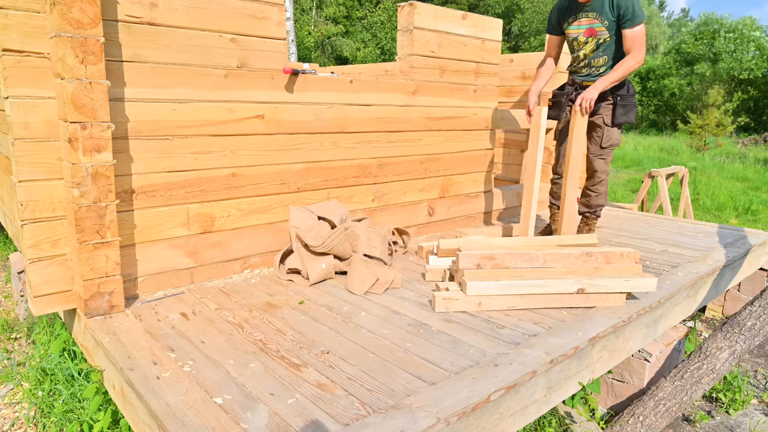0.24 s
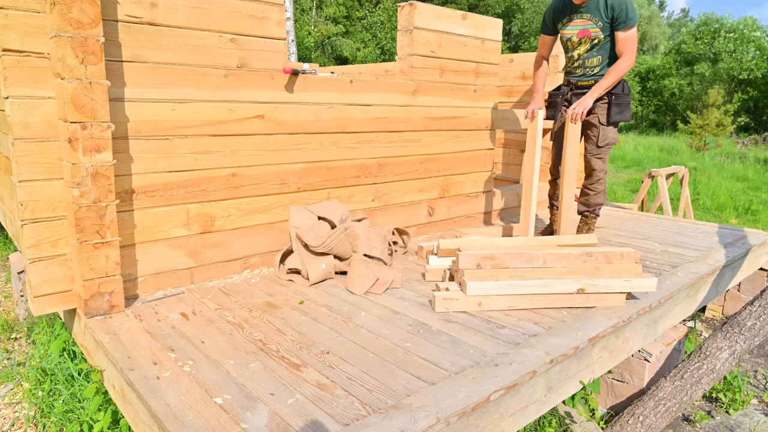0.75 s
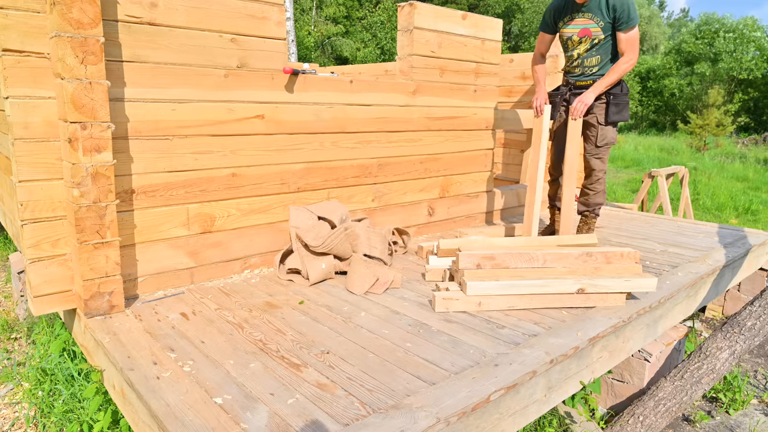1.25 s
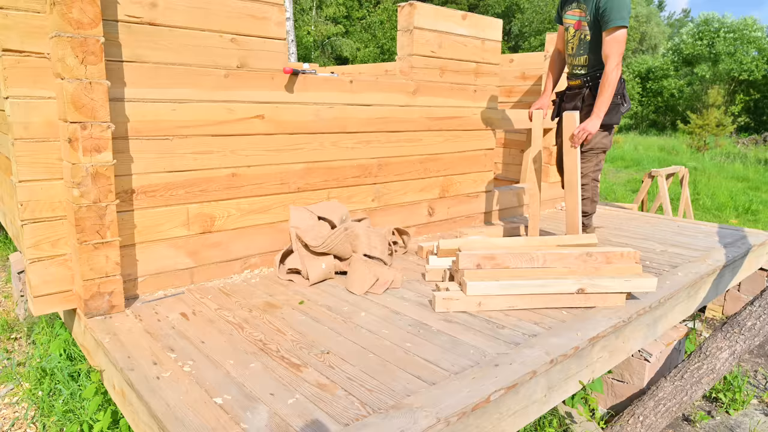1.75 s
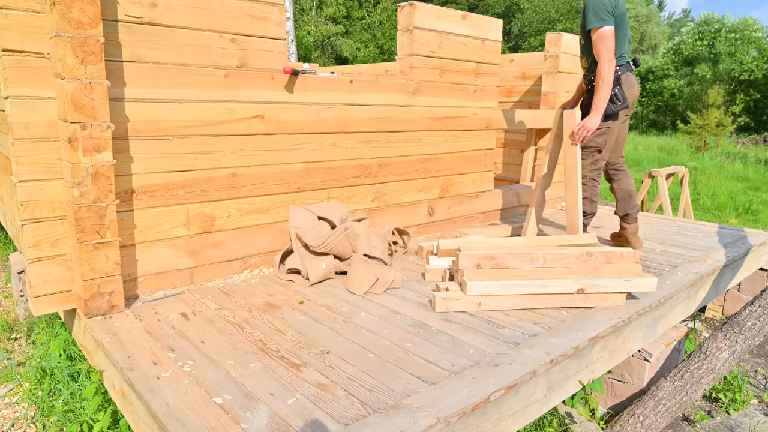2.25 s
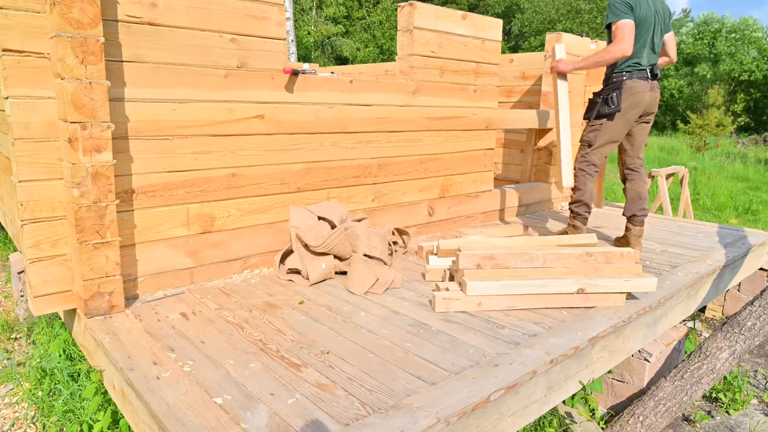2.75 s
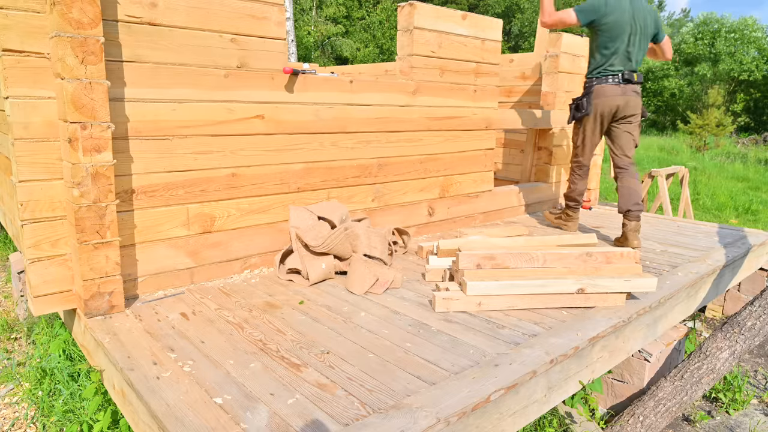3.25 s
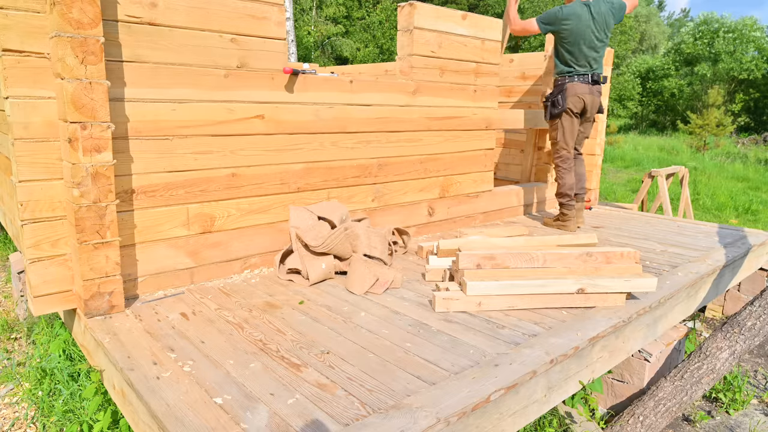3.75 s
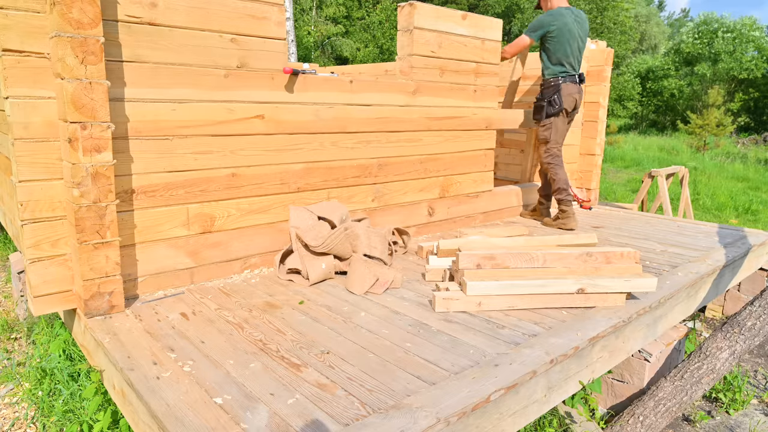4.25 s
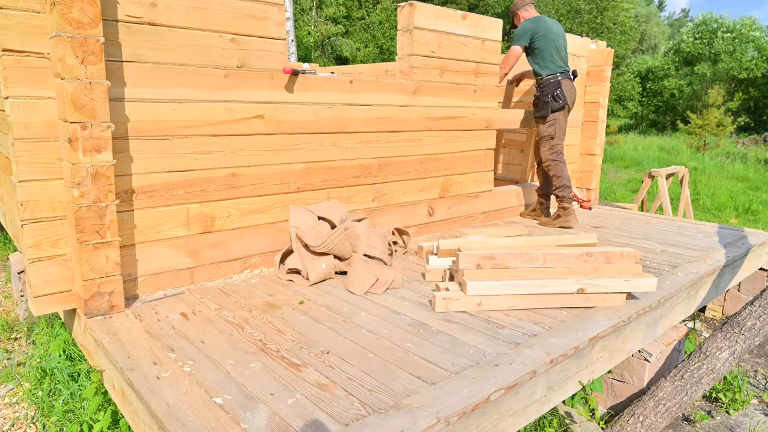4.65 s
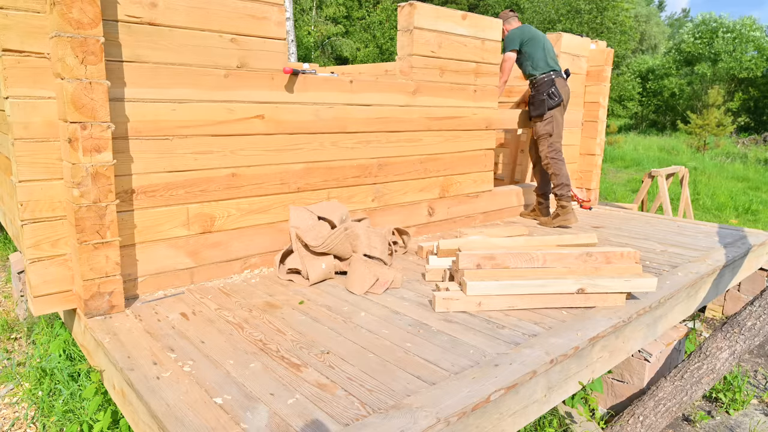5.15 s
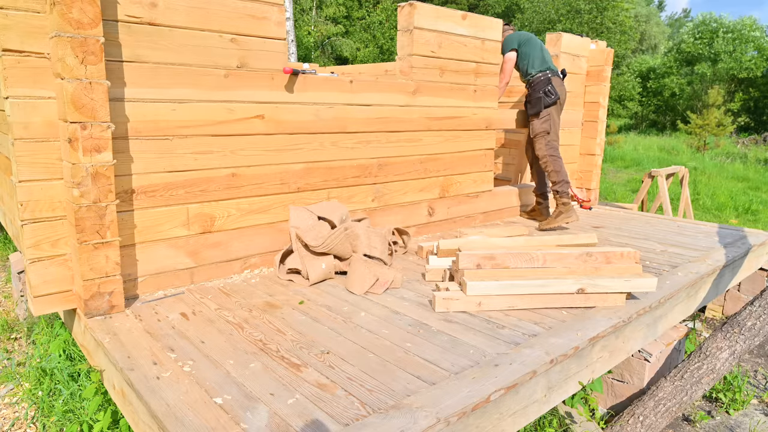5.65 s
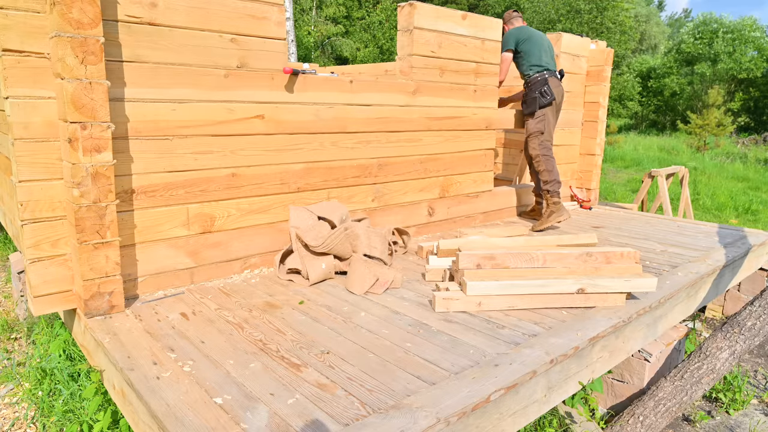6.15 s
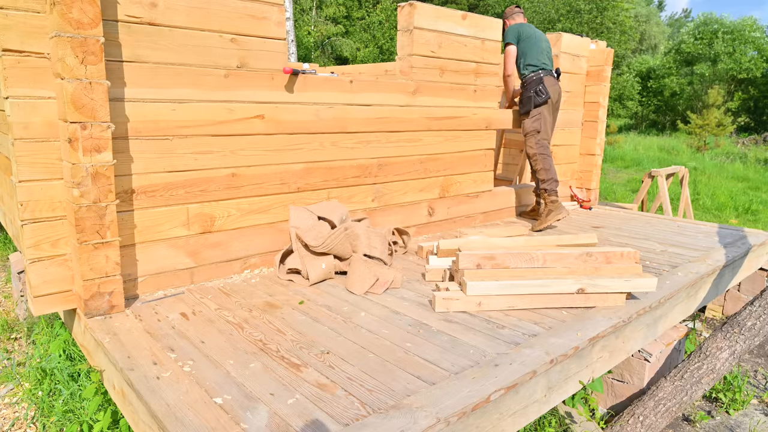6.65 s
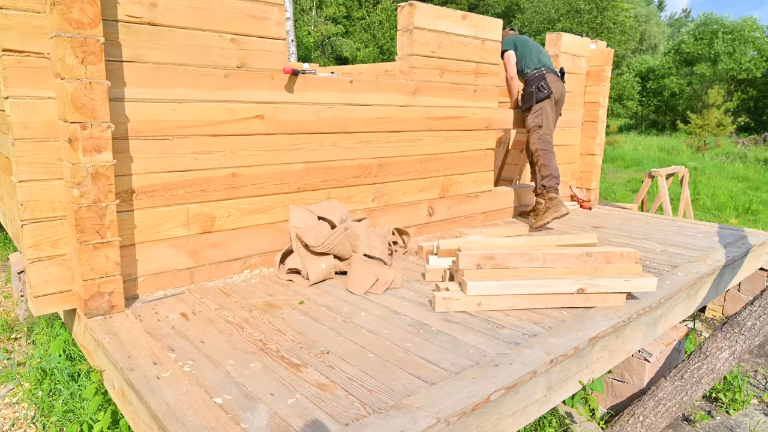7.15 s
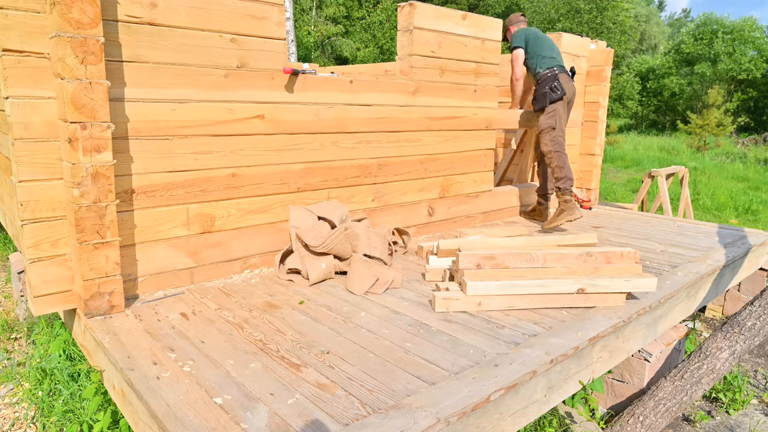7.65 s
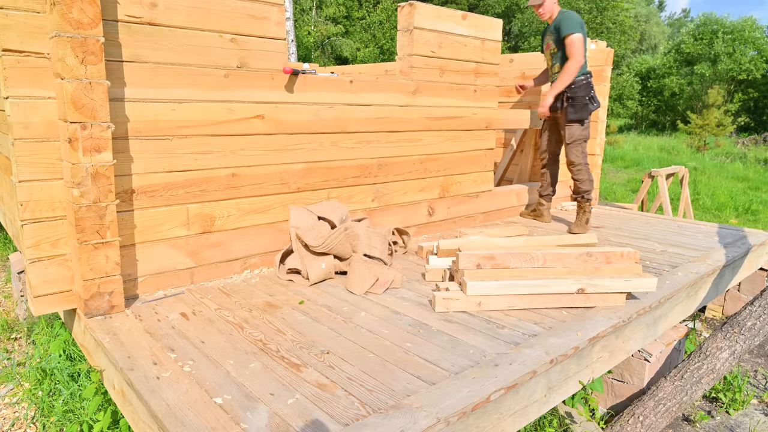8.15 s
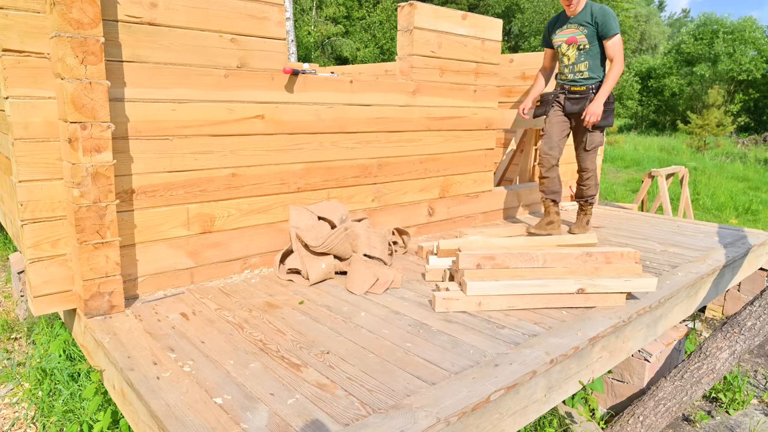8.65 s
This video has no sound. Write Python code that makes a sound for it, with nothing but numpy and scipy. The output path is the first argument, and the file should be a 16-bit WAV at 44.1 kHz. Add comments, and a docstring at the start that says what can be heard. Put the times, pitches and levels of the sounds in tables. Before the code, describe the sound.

Outdoors on a wooden platform, boards jostle, slide and hit one another, followed by two solid knocks, soft steps, and a cluster of woody blows around the middle with rough sliding. Two more knocks follow, then light steps and a last small tap. Fluted birdsong and small quick trills echo softly off trunks above a low forest hush, picked up by a fairly near stereo microphone.

```python
"""Boards are knocked together and against a log wall: each blow is three contacts (edge, face, rebound),
made of decaying modes and noise bursts that thud, clack and set a plank deck rumbling.
Boards also slide as rough noise, one with a slip-stick groan; wood ticks, and soft soles thump the planks.
Behind are birds, gliding tones scattered by tree trunks, and the filtered noise of wind, forest and leaves.
A limiter holds down the loudest peaks and a low-pass removes the top of the treble."""
import sys
import numpy as np
from scipy import signal
from scipy.fft import rfft, irfft, next_fast_len
from scipy.io import wavfile
from scipy.ndimage import uniform_filter1d, minimum_filter1d, map_coordinates

SR = 44100
rng = np.random.default_rng(int(sys.argv[2]) if len(sys.argv) > 2 else 0)


def store_wav(level_fs):
    """Save 16-bit WAV to argv[1]."""
    pcm = np.round(np.clip(np.atleast_2d(level_fs), -1, 1) * 32767)
    wavfile.write(sys.argv[1], SR, pcm.T.astype(np.int16))


N = 392490  # length [samples]


def amp(db):
    """Logarithmic level: decibels to amplitude gain."""
    return 10 ** (np.asarray(db) / 20)


def unit(x):
    """Normalisation: x at rms 1."""
    return x / np.sqrt(np.mean(x ** 2) + 1e-20)


def along(points, hz):
    """Logarithmic frequency: (frequency [Hz], value) points interpolated on a log axis."""
    f, v = np.transpose(points)
    return np.interp(np.log(hz + 1), np.log(f + 1), v)


def curves(rows):
    """Envelopes by linear interpolation: one value per sample for each column after the time."""
    s, *columns = np.transpose(rows)
    t = np.arange(N) / SR
    return [np.interp(t, s, column) for column in columns]


def during(rows):
    """Gating: 1 while a curve lasts, with soft ends."""
    t = np.arange(N) / SR
    inside = (t > rows[0][0]) & (t < rows[-1][0])
    return uniform_filter1d(1.0 * inside, size=400)


def wobble(rate, n=N):
    """Slow random modulation: a smooth curve through `rate` random knots a second."""
    knots = rng.standard_normal(int(n * rate / SR) + 4)
    return map_coordinates(knots, [np.arange(n) * rate / SR])


def filtered(x, response):
    """Linear filtering: the spectrum of x times a response of frequency."""
    n = x.shape[-1]
    m = next_fast_len(n + 8192)
    return irfft(rfft(x, m) * response(np.fft.rfftfreq(m, 1 / SR)), m)[..., :n]


# Coherence of the two channels: (frequency [Hz], correlation [0 to 1])
COHERENCE = [(30, .98), (100, .999), (300, .998), (700, .994), (1500, .988), (3000, .95), (4500, .72),
             (8000, .55), (15000, .45)]


def noise(spectrum, n=N):
    """Partly coherent stereo noise of rms 1: nearly mono in the bass, wider in the treble."""
    def mid_and_side(hz):
        angle = np.arccos(np.clip(along(COHERENCE, hz), 0, 1)) / 2
        return amp(along(spectrum, hz)) * [np.cos(angle), np.sin(angle)]
    mid, side = filtered(rng.standard_normal((2, n)), mid_and_side)
    return unit(np.array([mid + side, mid - side]))


def fade(t, t60, attack):
    """Damped response: a quick rise and an exponential decay of 60 dB in t60 seconds."""
    decay = np.exp(-np.log(1000) * t / max(t60, .002))
    return decay * (1 - np.exp(-t / max(attack, 1e-5)))


def struck(x):
    """Normalisation of an impact: rms 1 over its first 20 ms."""
    return x / np.sqrt(np.mean(x[..., :SR // 50] ** 2) + 1e-20)


def dying(x, t60s):
    """Frequency-dependent damping: each frequency of x decays at its own rate."""
    hz, t, z = signal.stft(x, SR, nperseg=512)
    decay = np.exp(-np.log(1000) * t / along(t60s, hz)[:, None])
    return signal.istft(z * decay, SR, nperseg=512)[1][:, :x.shape[1]]


def add(track, s, sound):
    """Superposition: mix a sound in at time s."""
    part = track[..., max(round(s * SR), 0):][..., :sound.shape[-1]]
    part += sound[..., :part.shape[-1]]


# Slow drift of the forest: (time [s], forest [dB], leaves [dB]), before the layer gains below
AIR = [(0.0, -52, -46.5), (1.63, -55.5, -50.5), (2.15, -55, -49), (4.66, -54.5, -50), (7.06, -56.5, -52),
       (8.9, -56, -51.5)]
# Puffs of wind: (time of the peak [s], level [dB])
GUSTS = [(3.9, -56), (4.6, -58.5), (6.55, -59), (7.4, -53)]
# Spectra of wind, far forest and near leaves: (frequency [Hz], relative density [dB per Hz])
WIND = [(10, 2), (30, -5.5), (60, -4), (120, -13.5), (300, -33), (1000, -73)]
FOREST = [(60, -3), (150, -4), (350, -0.5), (700, -0.5), (1200, 0.5), (2000, -5.5), (4000, -22),
          (9000, -37)]
LEAVES = [(600, -7), (1500, -3), (2500, 0), (3600, 2), (5000, -2.5), (6500, -10), (8500, -15.5),
          (13000, -19), (15800, -20.5)]
FOREST_DB, LEAVES_DB = 3.5, 1.5  # gain of each whole layer over its curve
GUST_WIDTH_S, CALM_DB = 0.25, -65.5  # half-width at 1/e of a puff; wind between puffs
PORTS_DB = -7.5  # wind of opposite sign at the microphone's two ports


def clearing():
    """Broadband turbulence: puffs on the microphone, far forest, and leaves a little to the left."""
    t = np.arange(N) / SR
    forest_db, leaves_db = curves(AIR)
    sway_db = .6 * wobble(5)
    puffs = sum(amp(db) * np.exp(-((t - s) / GUST_WIDTH_S) ** 2) for s, db in GUSTS)
    breeze = amp(CALM_DB) + puffs
    ports = amp(PORTS_DB) * noise(WIND)[0] * np.array([[1], [-1]])
    wind = breeze * amp(1.5 * wobble(7.1)) * (noise(WIND) + ports)
    forest = amp(forest_db + FOREST_DB + sway_db) * noise(FOREST)
    leaves = amp(leaves_db + LEAVES_DB + 0.66 * wobble(9.5)) * noise(LEAVES)
    return wind + forest + leaves * amp([[.3], [-.3]])


# Far birds together: (time [s], level of a note [dB])
CHORUS = [(0, -70), (1.6, -61), (2.2, -48), (3.0, -50.5), (3.7, -50), (4.8, -51.5), (5.4, -61.5),
          (7.8, -83), (8.2, -59), (8.9, -59)]


def far_notes(count):
    """Random superposition: quick glides, mostly falling, as loud as the chorus at that moment."""
    u = rng.random((count, 4))
    s = (np.arange(count) + u[:, 0]) / count * N / SR
    length = 0.02 + 0.0357 * u[:, 3]
    hz = 2400 + 1600 * u[:, 1]
    glide = .3 * u[:, 2] - .08
    db = np.interp(s, *np.transpose(CHORUS))
    return np.transpose([s, length, hz * (1 + glide), hz, hz * (1 - glide / 2), db])


# Pitch contours by name: (start [semitones from the middle pitch], end [same])
SHAPES = {"level": (-0.183, -.2), "arch": (-1.07, -1.44), "dip": (2.8, 1.6), "rise": (-1.21, 1.25),
          "climb": (-2, 3.8), "fall": (.8, -0.96), "slur": (5, -0.47), "sweep": (3.6, -6.5),
          "chip": (1.67, -1.9), "pip": (0.78, -.1), "tink": (-0.84, .4)}


def note(s, length, hz, db, shape):
    """Pitch contour: a named shape as (s, length, start Hz, middle Hz, end Hz, dB)."""
    start_hz, end_hz = hz * 2 ** (np.array(SHAPES[shape]) / 12)
    return s, length, start_hz, hz, end_hz, db


# Trills: (time [s], notes, pace from note to note [s], mean pitch [Hz], level [dB], shape)
TRILLS = [(0.075, 2, .112, 5940, -50.5, "sweep"), (0.52, 1, .1, 5600, -50, "sweep"),
          (0.665, 3, .12, 4340, -50, "tink"), (1.865, 3, .118, 6900, -66, "pip"),
          (1.925, 2, 0.18, 3013, -45.5, "slur"), (2.265, 4, 0.084, 2890, -52, "chip"),
          (2.295, 3, 0.13, 5050, -52.5, "tink"), (3.34, 3, .118, 6850, -57, "pip"),
          (3.385, 3, .12, 4360, -50, "sweep"), (3.764, 3, 0.14, 4750, -48, "tink"),
          (4.19, 2, .31, 2800, -49, "chip"), (4.68, 2, .108, 5840, -59, "sweep"),
          (4.96, 2, .12, 6080, -57, "tink"), (8.09, 3, .119, 6860, -57, "pip"),
          (8.145, 3, .116, 5140, -55, "pip"), (8.125, 2, 0.11, 4200, -53, "pip"),
          (8.315, 7, .093, 4040, -49, "pip"), (8.14, 2, .185, 2854, -48.5, "tink"),
          (8.555, 2, .29, 2780, -49, "tink"), (8.855, 1, .1, 4400, -52, "sweep"),
          (8.43, 2, 0.23, 2060, -49.5, "pip"), (8.51, 3, 0.17, 4950, -55, "tink")]
# Length of each syllable by shape [s]
SYLLABLE_S = {"sweep": .04, "tink": 0.0257, "pip": 0.032, "slur": .077, "chip": 0.0236}


def trill_notes():
    """Periodic repetition: a syllable at an even pace, its pitch varying slightly."""
    notes = []
    for s, count, pace_s, hz, db, shape in TRILLS:
        for k in range(round(count)):
            pitch_hz = hz * (1 + 0.0091 * rng.standard_normal())
            notes.append(note(s + k * pace_s, SYLLABLE_S[shape], pitch_hz, db, shape))
    return notes


def song(notes, warble, flutter_db):
    """Frequency and amplitude modulation: tones glide through three pitches, a little unsteadily."""
    out = np.zeros(N)
    for s, length, start_hz, middle_hz, end_hz, db in notes:
        n = max(int(length * SR), 64)
        u = np.linspace(0, 1, n)
        glide_hz = np.interp(u, [0, .5, 1], [start_hz, middle_hz, end_hz])
        hz = uniform_filter1d(glide_hz, size=n // 3)
        phase = 2 * np.pi * np.cumsum(hz * (1 + warble * wobble(229, n))) / SR
        swell = np.sqrt(np.abs(np.sin(np.pi * u))) * amp(flutter_db * wobble(75.0, n))
        add(out, s, amp(db) * unit(swell * np.sin(phase)))
    return out


# Single fluted notes: (time [s], length [s], middle pitch [Hz], level [dB], shape)
WHISTLES = [(0.397, 0.047, 4020, -44, "fall"), (0.473, .03, 5750, -47.5, "rise"),
            (0.52, .06, 2350, -53, "level"), (0.575, 0.069, 1850, -48, "slur"),
            (0.651, 0.14, 1952, -46.5, "arch"), (0.825, 0.087, 2275, -42.5, "level"),
            (0.89, 0.074, 2460, -49, "arch"), (0.942, 0.072, 2186, -46.5, "fall"),
            (1.238, .085, 1830, -49, "fall"), (1.34, 0.094, 1930, -42.5, "arch"),
            (1.562, 0.096, 1672, -52, "level"), (2.62, .078, 2850, -50.5, "level"),
            (2.772, 0.043, 2940, -48, "rise"), (2.858, 0.087, 2880, -47.5, "fall"),
            (3.149, 0.21, 2270, -58, "level"), (3.25, 0.064, 3890, -53, "level"),
            (3.358, 0.058, 2630, -49, "tink"), (3.70, .085, 2930, -48.5, "arch"),
            (3.898, 0.037, 2650, -45.5, "arch"), (4.599, 0.11, 2034, -50.5, "arch"),
            (4.74, .04, 2820, -53, "rise"), (4.839, 0.053, 2216, -46.5, "rise"),
            (4.92, 0.14, 2104, -45, "level"), (5.35, .22, 2062, -43, "dip"),
            (5.48, 0.097, 2280, -47, "rise"), (5.68, .17, 1976, -46, "arch"),
            (5.84, 0.071, 1819, -47.5, "level"), (6.059, 0.09, 3195, -49, "rise"),
            (6.139, .16, 2850, -53.5, "climb"), (6.93, .1, 2146, -56, "level"),
            (7.8, .2, 2165, -56.5, "level")]
# Reverberation among the trunks: (frequency [Hz], t60 [s])
TREES_T60 = [(1500, 0.34), (4000, 0.55), (8000, 0.74)]
CHIRPS_LEFT_DB = 0.5  # left up and right down by this much: small birds sit to the left


def birds():
    """Multiple scattering: trunks return the songbirds' notes as a diffuse tail, far ones most."""
    flutes = song([note(*row) for row in WHISTLES], warble=0.013, flutter_db=2.8)
    chirps = song(trill_notes(), warble=0.0085, flutter_db=2.0)
    to_left = amp(CHIRPS_LEFT_DB * np.array([[1], [-1]]))
    near = amp(-0.5) * flutes + amp(-0.4) * chirps * to_left
    far = song(far_notes(count=260), warble=0.011, flutter_db=8.5)
    trunks = dying(noise([(100, 0.026), (10000, 0)], SR // 2), TREES_T60)
    trunks = trunks / np.linalg.norm(trunks[0])
    echo = signal.fftconvolve(amp(-4.5) * near + amp(-0.5) * far, trunks, axes=1)[:, :N]
    return near + amp(-10) * far + echo


# Wood sliding on wood, one list a slide: (time [s], hiss before a 10.5 dB lift [dB])
SLIDES = [
    [(0.24, -77), (0.322, -58), (0.331, -43.5), (0.364, -43), (0.37, -62)],
    [(4.3, -76), (4.37, -58), (4.45, -56.5), (4.54, -83)],
    [(5.36, -59), (5.39, -54.5), (5.435, -49.5), (5.475, -49), (5.53, -59), (5.62, -70)],
]
# Spectrum of the scrape: (frequency [Hz], relative density [dB per Hz])
SCRAPE = [(300, -5), (700, 17.5), (1500, 8), (3500, 15.5), (5500, 10), (8000, -1.5), (13000, 2),
          (16000, -13)]
# Groan of a tight board: (time [s], slips a second [Hz], level [dB])
GROAN = [(5.48, 340, -65), (5.52, 227, -38.5), (5.56, 254, -45), (5.595, 156, -42), (5.63, 120, -67)]


def slides():
    """Stick-slip friction: sawn fibres catch and let go; a tight board groans lower as it slows."""
    hiss = sum(amp(curves(rows)[0] + 10.5) * during(rows) for rows in SLIDES)
    catches = amp(4.2 * wobble(600) + 1.3 * wobble(80))
    grain = unit(noise(SCRAPE) * catches)
    slips_hz, groan_db = curves(GROAN)
    phase = 2 * np.pi * np.cumsum(slips_hz * (1 + 0.043 * wobble(120))) / SR
    groan = unit(np.sin(phase) + 0.33 * np.sin(2 * phase) + 0.34 * np.sin(3 * phase))
    return hiss * grain + amp(groan_db) * during(GROAN) * groan


# Spectrum of the deck and log wall: (frequency [Hz], relative density [dB per Hz])
DECK = [(25, -34), (60, -7.5), (110, -5.5), (180, 4.5), (280, -7), (420, -12), (700, -16.5), (1200, -19),
        (3000, -96)]
# Damping of the deck: (frequency [Hz], t60 [s])
DECK_T60 = [(80, 0.53), (200, 0.42), (500, 0.48), (1000, 0.21), (3000, .2)]


def deck(t):
    """Structure-borne sound: the planks and the log wall take up a blow and rumble on."""
    return dying(noise(DECK, len(t)), DECK_T60)[0] * (1 - np.exp(-t / 0.0026))


# Boots and light bumps on the deck: (time [s], level [dB], scuff re that level before a 22 dB cut [dB])
STEPS = [(2.378, -33, 1), (2.418, -36, -16), (2.669, -46.5, 16), (3.303, -33.5, -2), (3.417, -34, -15),
         (3.553, -40.5, 5), (4.079, -36.5, -21), (4.13, -29.5, 7), (7.903, -42.5, 13), (8.199, -37.5, -2),
         (8.36, -43, 14)]
# Crowded wood modes, low and middle: (frequency [Hz], relative density [dB per Hz])
BODY = [(60, -42), (130, -27), (230, 0.5), (380, 6), (520, -5.5), (750, -24), (1500, -68)]
CLACK = [(200, -23), (480, 7.5), (800, 5), (1100, -2), (1600, -9.5), (2500, -17.5), (5000, -40)]


def steps():
    """Soft impact: yielding soles thump the planks, excite one plank tone and scuff a little."""
    out, t = np.zeros((2, N)), np.arange(SR // 2) / SR
    for s, db, scuff_db in STEPS:
        thump = amp(-11.5) * struck(noise(BODY, len(t)) * fade(t, t60=0.05, attack=0.0022))
        plank = amp(-15.5) * struck(np.sin(2 * np.pi * 165 * t) * fade(t, t60=0.075, attack=0.0065))
        scuff = amp(scuff_db - 22) * struck(noise(CLACK, len(t)) * fade(t, t60=0.058, attack=0.00067))
        add(out, s, amp(db) * (thump + plank + scuff + amp(-13.5) * deck(t)))
    return out


# Small dry ticks of handled wood: (time [s], level [dB])
TICKS = [(0.014, -32), (0.375, -37), (0.645, -67), (5.384, -40.5), (5.47, -45), (6.457, -49), (6.834, -51),
         (7.905, -60)]
# Treble of a snapping edge: (frequency [Hz], relative density [dB per Hz])
CLICK = [(500, -30), (1500, 7), (3500, 8.5), (6000, -5.5), (9000, -15.5), (15000, -17)]


def ticks():
    """Impulsive excitation: a splinter or an edge catches for a moment."""
    out, t = np.zeros((2, N)), np.arange(SR // 10) / SR
    for s, db in TICKS:
        burst = noise(CLICK, len(t)) * fade(t, t60=0.018, attack=0.00026)
        add(out, s, amp(db) * struck(burst))
    return out


# Modes of the boards and wall: (frequency [Hz], mean relative strength [dB], t60 [s])
TIMBER = [(124.7, 14, 0.26), (153.6, 11, 0.21), (217, 8.5, 0.37), (278, 10, 0.35), (330, 5, 0.43),
          (395, -9, 0.75), (505, 0.5, 0.24), (546, -29, 0.26), (616, -29, .25), (760, -21, .22),
          (880, -24, .15), (1000, -11, .2), (1140, -33, .17)]


def timber(t, scatter_db):
    """Modal superposition: the wood's modes, at new strengths for every point of contact."""
    hz, db, t60 = np.transpose(TIMBER)[:, :, None]
    strength = amp(db + scatter_db * rng.standard_normal(hz.shape)) * rng.choice([-1, 1], hz.shape)
    modes = strength * np.sin(2 * np.pi * hz * t) * np.exp(-np.log(1000) * t / t60)
    return struck(np.sum(modes, axis=0))


# Modes of a loosely held board: (ratio to the main ring, level [dB], share of that ring's t60)
BENDING = [(0.656, -12, 1), (1, 1, 0.9), (1.114, -8, 0.63)]


def ring(t, hz, t60):
    """Bending vibration: a loosely held board rings on in its modes, a little unsteadily."""
    rattle = .2 * wobble(130, len(t))  # phase [rad]
    total = 0
    for ratio, db, life in BENDING:
        tone = np.sin(2 * np.pi * hz * ratio * t + rattle)
        total = total + amp(db) * struck(tone * fade(t, life * t60, attack=0.001))
    return amp(-14) * total


# Snap of a board's edge: (frequency [Hz], relative density [dB per Hz])
CRACK = [(400, 2), (900, -5), (1600, -20), (2600, -2), (4000, -10), (8000, -18), (15000, -45)]
EDGE_HZ, EDGE_DECK_DB = 578, -13.5  # an edge alone: its thud, and what reaches the deck
# Shorter contacts thud higher and excite more treble: (dB re the thud at EDGE_HZ, dB per octave of thud)
BODY_DB, BODY_DB_PER_OCT = 2, 9
CLACK_DB, CLACK_DB_PER_OCT = 0.5, 13
CRACK_DB, CRACK_DB_PER_OCT = -18.5, 15
CLICK_DB, CLICK_DB_PER_OCT = -23, 11.5


def contact(t, thud_hz, thud_t60, deck_db, clack_db=0, snap_db=0):
    """Impact excitation: a board bends (thud), its modes sound (body, clack), its edge snaps (crack, click)."""
    def burst(spectrum, t60, attack):
        return struck(noise(spectrum, len(t)) * fade(t, t60, attack))
    octaves = np.log2(thud_hz / EDGE_HZ)
    thud = struck(np.sin(2 * np.pi * thud_hz * t) * fade(t, thud_t60, attack=0.39 / thud_hz))
    # a firm grip damps all of a board's modes alike
    body = amp(BODY_DB + BODY_DB_PER_OCT * octaves) * burst(BODY, 1.61 * thud_t60, attack=0.001)[0]
    clack = amp(CLACK_DB + CLACK_DB_PER_OCT * octaves) * burst(CLACK, 1.3 * thud_t60, attack=0.00036)[0]
    crack = amp(CRACK_DB + CRACK_DB_PER_OCT * octaves) * burst(CRACK, t60=0.036, attack=0.00041)
    click = amp(CLICK_DB + CLICK_DB_PER_OCT * octaves) * burst(CLICK, t60=0.0081, attack=0.0015)
    frame = amp(deck_db - 1.5) * deck(t) + amp(deck_db - 2.0) * timber(t, scatter_db=1.5)
    board = thud + amp(clack_db / 2) * body + amp(clack_db) * clack
    return amp(-10.5) * (board + amp(snap_db) * (crack + click) + frame)


THUD_CYCLES = 18.2  # a light contact dies by 60 dB in so many cycles


def light_contact(t, hz, deck_db, clack_db=0, snap_db=0):
    """Constant-Q damping: the decay time of a light contact is a fixed number of cycles."""
    return contact(t, hz, THUD_CYCLES / hz, deck_db, clack_db, snap_db)


# Boards knocked home; levels are gains before each sound's own scaling:
# (time [s], edge [dB], landing after [s], landing [dB], thud [Hz], thud t60 [s], clack [dB], snap [dB],
#  deck [dB], ring [Hz], ring t60 [s], ring [dB], rebound after [s], rebound [dB], rebound [Hz])
BLOWS = [(0.350, -23, .011, 5, 321, 0.086, -2, -2, -11, 1045, 0.16, -16, .023, -1.5, 185),
         (1.409, -18.5, 0.0038, -2.5, 180, .13, 0, -4, -5.5, 955, 0.11, -21, .0395, 4, 308),
         (1.836, -28.5, .002, -1.5, 360, 0.052, -2.5, -3, -16.5, 842, .11, -21.5, 0.034, -9.5, 193),
         (4.951, -20.5, 0.0052, 2, 209, 0.08, 0, -2, -9, 853, 0.19, -13, 0.033, -6.5, 177.7),
         (5.336, -23.5, 0.0065, -1, 188, 0.13, 0, 5, -11.5, 896, .12, -24, 0.053, -15, 135),
         (5.941, -26.5, 0.00598, -15.5, 161, 0.081, 2.5, 0, -1, 914, 0.2, -20, .061, -23.5, 213),
         (7.052, -27, .003, 4.5, 194, 0.17, 1, 8.5, -10.5, 960, 0.22, -20, 0.071, -2, 179),
         (7.507, -27, .007, -5.5, 279, 0.13, -6.5, 8, -3, 1520, 0.27, -21.5, 0.082, -24, 220)]
# Boards jostling lightly: (time [s], level [dB], thud [Hz], deck [dB]), gains before scaling
JOSTLES = [(0.001, -16.5, 490, -17), (0.013, -22.5, 530, -25), (0.026, -17.5, 540, -28),
           (0.329, -23.5, 374, -13), (0.464, -15, 180, -1.5), (0.504, -19.5, 164, -2.5),
           (8.888, -29, 303, -1)]
REBOUND_HZ = 179  # pitch of a usual rebound


def knocks():
    """Successive impacts: the edge sets the board ringing, the face lands, the board rebounds once."""
    out, t = np.zeros((2, N)), np.arange(SR * 3 // 4) / SR
    for (s, edge_db, landing_s, landing_db, thud_hz, thud_t60, clack_db, snap_db, deck_db,
         ring_hz, ring_t60, ring_db, rebound_s, rebound_db, rebound_hz) in BLOWS:
        edge = light_contact(t, EDGE_HZ, EDGE_DECK_DB, clack_db=2, snap_db=-3)
        add(out, s, amp(edge_db) * edge + amp(ring_db) * ring(t, ring_hz, ring_t60))
        landing = contact(t, thud_hz, thud_t60, deck_db, clack_db, snap_db)
        add(out, s + landing_s, amp(landing_db) * landing)
        # the deck takes up the slower rebounds best
        rebound_deck_db = -9.5 - 13.8 * np.log2(rebound_hz / REBOUND_HZ)
        rebound = light_contact(t, rebound_hz, rebound_deck_db, clack_db - 4.0, snap_db=-2)
        add(out, s + rebound_s, amp(rebound_db) * rebound)
    for s, db, thud_hz, deck_db in JOSTLES:
        add(out, s, amp(db) * light_contact(t, thud_hz, deck_db))
    # the knocks carry little sound below about 45 Hz
    return signal.sosfilt(signal.butter(1, 45, "highpass", fs=SR, output="sos"), out)


def scene():
    """Superposition of all the sources, from the background to the knocks."""
    return clearing() + birds() + slides() + steps() + ticks() + knocks()


def limited(x, ceiling, recovery_db):
    """Peak limiting: the gain drops within about 2 ms and climbs back at recovery_db a second."""
    over = 20 * np.log10(np.maximum(np.abs(x).max(axis=0) / ceiling, 1))
    climb = recovery_db * np.arange(N) / SR
    cut = np.maximum.accumulate(over + climb) - climb
    return x * uniform_filter1d(minimum_filter1d(amp(-cut), size=89), size=89)


TOP_HZ = 15750  # upper band limit


def record(dry):
    """Peak limiting and band limiting: loud peaks are held down, then the top treble is removed."""
    held = limited(dry, ceiling=0.7, recovery_db=30.0)
    return filtered(held, lambda hz: hz < TOP_HZ)


dry = scene()
out = record(dry)
store_wav(out)
```